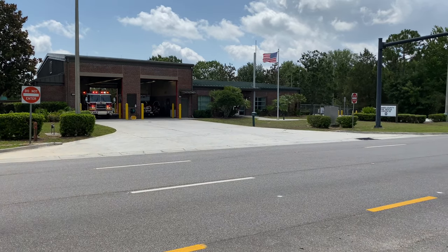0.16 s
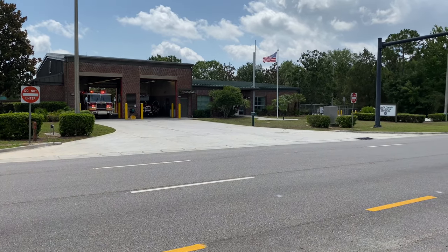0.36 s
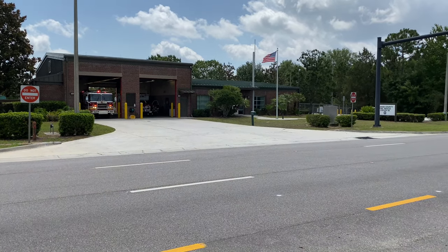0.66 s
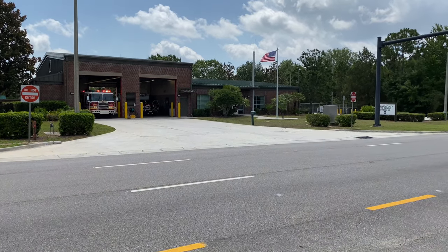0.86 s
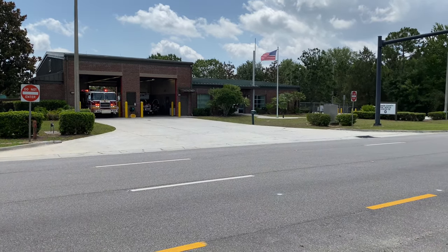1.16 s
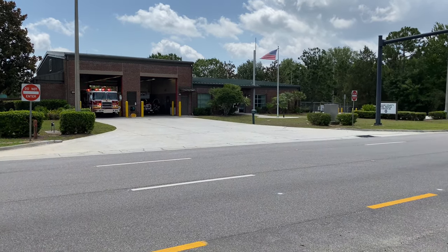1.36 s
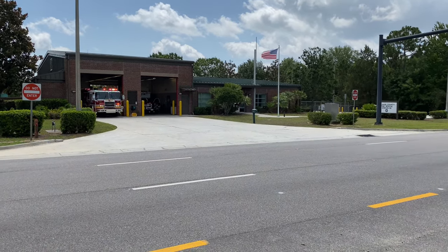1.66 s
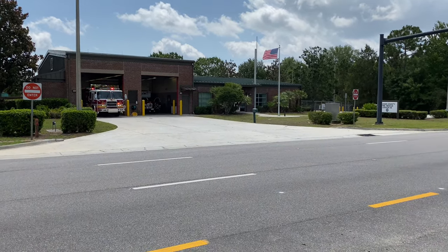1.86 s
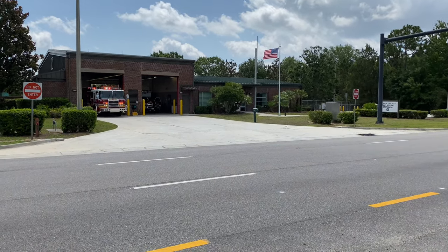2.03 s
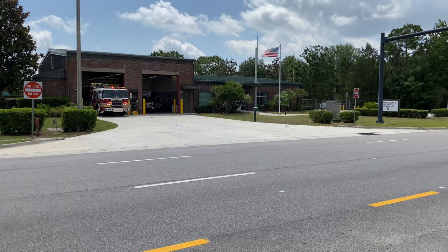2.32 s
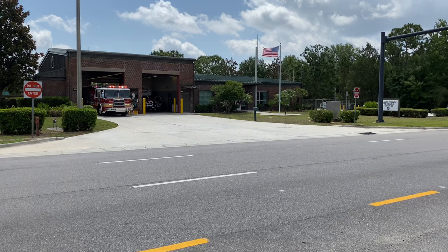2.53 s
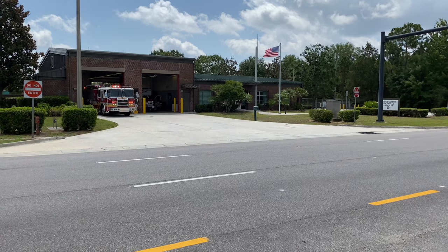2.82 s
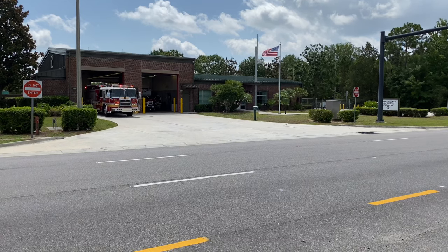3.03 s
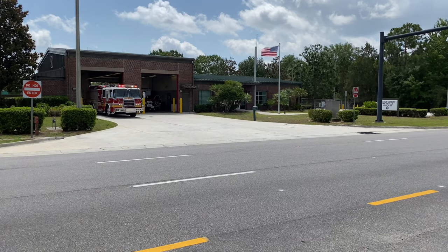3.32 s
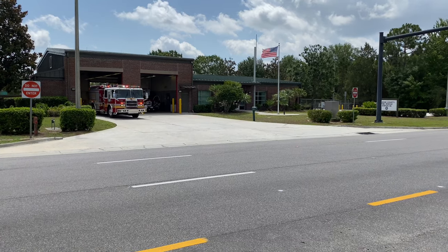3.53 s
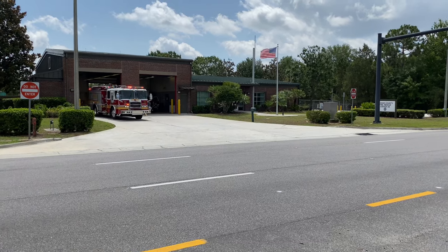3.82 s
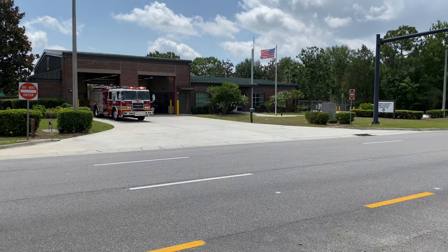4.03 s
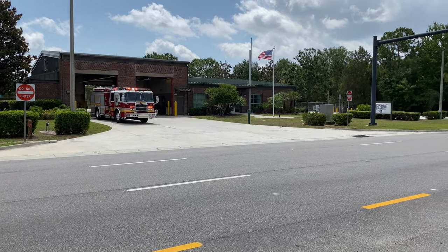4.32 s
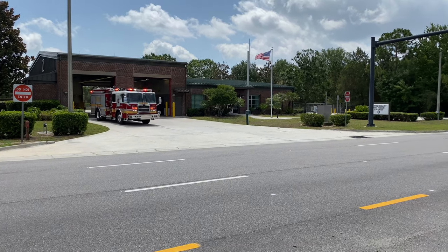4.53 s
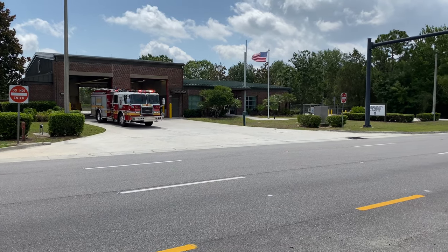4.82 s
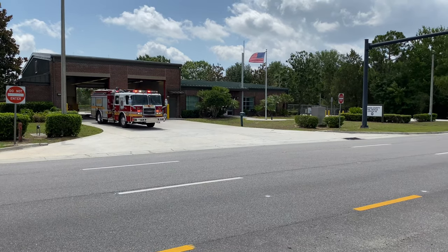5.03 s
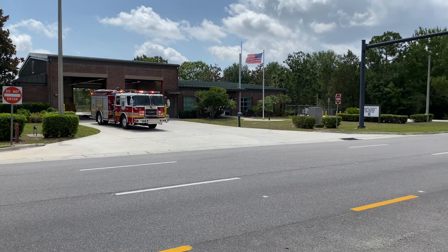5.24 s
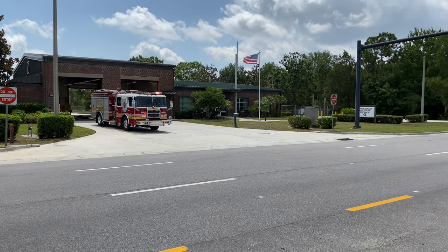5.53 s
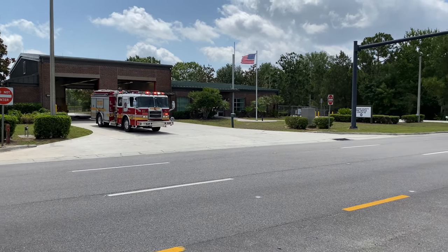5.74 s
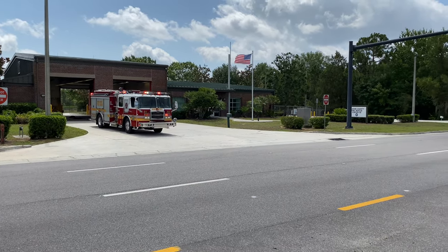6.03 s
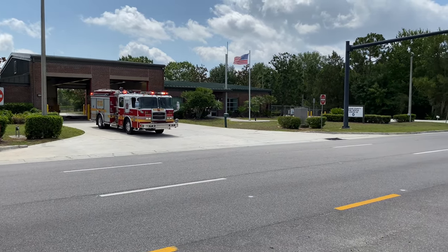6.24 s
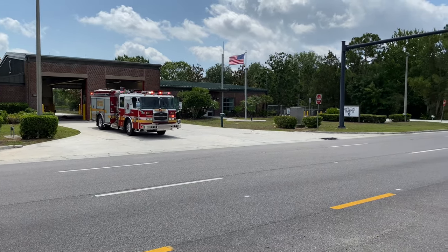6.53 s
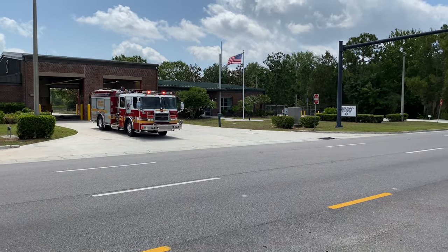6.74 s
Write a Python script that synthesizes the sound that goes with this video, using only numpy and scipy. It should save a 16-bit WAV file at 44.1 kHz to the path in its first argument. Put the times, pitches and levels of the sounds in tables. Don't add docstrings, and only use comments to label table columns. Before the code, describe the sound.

Outdoors across a road, a large diesel truck idles with a low throb and a dying machine hum. After about a second it revs and rolls out, growing louder with knocking, gear rattle and fan hiss. It lifts off, winds down closer to the listener, then brakes squeal and air spurts out. Wind buffets the hand-held phone throughout.

```python
import sys
import numpy as np
from scipy import signal
from scipy.fft import rfft, irfft
from scipy.io import wavfile
from scipy.ndimage import uniform_filter1d

SR = 44100
rng = np.random.default_rng(int(sys.argv[2]) if len(sys.argv) > 2 else 0)


def boost_factor(decibels):
    exponent = np.asarray(decibels, float) / 20
    return 10 ** exponent


def put_to_file(sound):
    columns = np.atleast_2d(sound).T
    safe = np.clip(columns, -1, 1)
    whole_steps = np.round(safe * 32767)
    wavfile.write(sys.argv[1], SR, whole_steps.astype(np.int16))


N = 303408
T = np.arange(N) / SR
HZ = np.maximum(np.fft.rfftfreq(N, 1 / SR), 1)
TOP_HZ = 15700

# start_s, pitch_hz, level_db
ALTERNATOR = [(1.75, 10100, -71), (1.85, 10700, -72), (1.96, 11150, -73), (2.2, 12050, -74),
              (2.35, 12400, -78)]


def unit(x):
    return x / np.sqrt(np.mean(x ** 2))


def over_hz(table):
    hz, value = np.transpose(table)
    return np.interp(np.log(HZ), np.log(np.maximum(hz, 1)), value)


def over_time(table):
    s, *columns = np.transpose(table)
    return [np.interp(T, s, column) for column in columns]


def swells(events):
    return sum(height * np.exp(-((T - s) / width_s) ** 2) for s, height, width_s in events)


def noise():
    return rng.standard_normal(N)


def smooth(x, size):
    return uniform_filter1d(uniform_filter1d(x, size), size)


def walk(rate):
    hold = int(SR / rate)
    steps = np.repeat(rng.standard_normal(N // hold + 1), hold)
    return unit(smooth(steps, hold)[:N])


def colour(x, table):
    below = np.maximum(np.log2(table[0][0] / HZ), 0)
    above = np.maximum(np.log2(HZ / table[-1][0]), 0)
    return unit(irfft(rfft(x) * boost_factor(over_hz(table) - 40 * (below + above)), N))


def ring(x, hz, width_hz):
    return signal.lfilter(*signal.iirpeak(hz, hz / width_hz, SR), x)


def ring_twice(x, hz, width_hz):
    return ring(ring(x, hz, width_hz), hz, width_hz)


def bursts(events, decay_s, sharp):
    out = np.zeros(N)
    t = np.arange(int(SR * .2)) / SR
    for s, db, hz in events:
        grain = rng.standard_normal(len(t)) * t * np.exp(-t / decay_s)
        burst = ring_twice(grain, hz, hz / sharp) * (1 - t / t[-1])
        i = int(s * SR)
        out[i:i + len(t)] += boost_factor(db) * burst / np.abs(burst).max()
    return out


def lifetime(table, edge_s):
    return np.clip(np.minimum(T - table[0][0], table[-1][0] - T) / edge_s, 0, 1)


def tones(tables, waver_hz, waver_db, rate):
    out = 0
    for table in tables:
        hz, db = over_time(table)
        phase = 2 * np.pi * np.cumsum(hz + waver_hz * walk(2 * rate)) / SR
        out = out + lifetime(table, .006) * boost_factor(db + waver_db * walk(rate)) * np.sin(phase)
    return out


def wind(alike=0.85):
    # centre_s, gain_db, width_s
    gusts = [(.07, 13.5, 0.085), (.35, 7, 0.07), (.62, 6, 0.26), (1.1, 10, 0.083), (1.22, 13.5, 0.029),
             (1.45, 8.5, .2), (2.3, -13, 0.18), (2.68, -3, .08), (2.89, 6, .05), (3.29, 20.5, .04),
             (3.49, 10, 0.052), (4.15, 4, .15), (4.37, -10, 0.048), (5.1, 5, .15), (5.42, 7, 0.048),
             (5.67, 7.5, 0.046), (5.87, 5.5, 0.11), (6.2, 3.5, .05), (6.31, 4.5, .04), (6.47, 5.5, 0.052),
             (6.6, -7, .06), (6.75, 5, .08)]
    # start_s, peak_db, centre_hz
    buffets = [(.065, -30, 60), (.33, -28, 70), (1.07, -28, 90), (1.2, -30, 110), (1.5, -28, 80),
               (2.83, -28, 110), (3.275, -21, 100), (3.45, -29, 100), (5.39, -31, 60), (5.64, -29, 90),
               (5.9, -35, 60), (6.13, -35, 80)]
    # frequency_hz, density_db (per Hz)
    rumble = [(24, -38), (34, -15), (50, -4), (65, -3.5), (90, -3), (130, -9.5), (200, -31.5), (300, -47)]
    breeze_db, flutter_db = -37.5, 2
    gust = boost_factor(breeze_db + swells(gusts) + flutter_db * walk(14))
    mid, side = (gust * colour(noise(), rumble) + bursts(buffets, 0.016, sharp=0.93) for _ in "ms")
    alike = np.clip(alike, 0, 1)
    return np.sqrt((1 + alike) / 2) * mid + np.sqrt((1 - alike) / 2) * side * np.array([[1], [-1]])


def drone():
    # start_s, pitch_hz, level_db
    hum = [(0, 189.8, -36), (.45, 188, -37), (.6, 187, -50)]
    return tones([hum], 3.05, 2., rate=10.1)


def tyre_grit():
    # start_s, peak_db, pitch_hz
    ticks = [(0.3701, -57, 11000), (2.6744, -53, 11200), (2.6973, -52, 11200), (2.8799, -51, 11290),
             (3.0584, -48, 11020), (3.0868, -53, 11200), (3.0999, -46, 11200), (3.1144, -50, 11200),
             (3.1398, -43, 11220), (3.1674, -49, 11260), (5.5847, -51, 11200)]
    return bursts(ticks, .0007, sharp=4.)


def body_rattles():
    # start_s, peak_db, pitch_hz
    clanks = [(5.56, -42, 1300), (5.565, -50, 4000), (5.7, -44, 3300), (5.705, -50, 4500),
              (5.81, -43, 2300), (5.955, -36, 1900), (5.965, -33, 1400)]
    return bursts(clanks, 0.004034, sharp=2.63)


def howls():
    # start_s, pitch_hz, level_db
    bands = [
        [(.7, 2300, -66), (1.1, 2330, -61), (2.0, 2330, -66), (2.45, 2280, -67), (2.75, 2290, -57),
         (3.4, 2280, -57), (3.8, 2450, -55), (4.5, 2420, -54), (4.8, 2330, -62), (5.8, 2330, -62),
         (6.1, 2330, -70)],
        [(2.0, 560, -56), (2.4, 590, -49), (2.75, 595, -45), (3.1, 590, -54), (3.7, 590, -52), (4.0, 590, -45),
         (4.4, 585, -49), (4.7, 580, -58)],
        [(4.7, 520, -54), (5.1, 545, -48), (5.5, 515, -47.5), (5.9, 495, -47.5), (6.3, 465, -52),
         (6.6, 435, -49), (6.88, 410, -50)],
        [(5.6, 900, -62), (6.0, 885, -52), (6.3, 840, -53), (6.6, 770, -51), (6.88, 740, -53)],
        [(6.25, 12700, -68), (6.34, 12900, -57), (6.45, 12900, -56), (6.62, 12700, -60)],
    ]
    sharp = 9
    out = 0
    for table in bands:
        hz, db = over_time(table)
        size = int(SR * sharp / table[0][1] / 2)
        a, b = (unit(smooth(noise(), size)) for _ in "ab")
        phase = 2 * np.pi * np.cumsum(hz) / SR
        out = out + lifetime(table, .05) * boost_factor(db) * (a * np.sin(phase) + b * np.cos(phase))
    return out


def chassis():
    # start_s, peak_db, pitch_hz
    knocks = [(1.7035, -38, 1890), (2.2618, -37, 1890), (2.7432, -35, 1780), (2.9312, -36, 1840),
              (3.0759, -35, 1980), (3.1652, -34, 1840), (3.3797, -35, 1950), (3.6152, -33, 1860),
              (3.7219, -30, 1920), (3.7589, -31, 1810), (3.8257, -32, 1890), (3.916, -31, 1820),
              (3.9818, -30, 1900), (4.137, -32, 1790), (4.1884, -31, 1870), (4.2632, -31, 1830),
              (4.3425, -29, 2010), (4.4737, -32, 1890), (4.5401, -29, 1870), (4.6024, -33, 1840),
              (5.2006, -36, 1800), (5.4046, -39, 1820), (5.9504, -36, 2080), (6.1424, -35, 2010),
              (6.5286, -36, 1890), (6.6408, -35, 1970)]
    # start_s, peak_db, pitch_hz
    chirps = [(5.7, -54, 3900), (5.99, -59, 5200), (6.145, -54, 4100), (6.245, -54, 4000),
              (6.53, -56, 4050)]
    breathy = boost_factor(1.5) * tones([ALTERNATOR], 170., 4., rate=150)
    teeth = boost_factor(-3.0) * bursts(knocks, .004, sharp=5.)
    return howls() + breathy + teeth + bursts(chirps, .014, sharp=16.)


def air_leak():
    # start_s, level_db
    leak = [(0, -62.5), (1.2, -62), (2.2, -58.5), (2.9, -60.5), (3.3, -66), (6.88, -103)]
    air = noise()
    high = unit(ring_twice(air, 7000., 1900.))
    low = unit(ring_twice(air, 3150., 600.))
    return boost_factor(over_time(leak)[0]) * (high + boost_factor(-1.0) * low)


def turbo():
    # start_s, pitch_hz, level_db
    spool = [
        [(0, 6415, -63), (.6, 6425, -63.5), (1.06, 6452, -62), (1.14, 7000, -63)],
        [(4.1, 9250, -80), (4.6, 8780, -69), (4.95, 8300, -72), (5.3, 7660, -70), (5.5, 7380, -71),
         (5.62, 7250, -64), (5.9, 7010, -66), (6.3, 6710, -64), (6.88, 6650, -64)],
    ]
    # start_s, pitch_hz, level_db
    belt = [
        [(0, 5250, -69), (.9, 5050, -69), (2.0, 4950, -69), (3.0, 5250, -69), (4.5, 5200, -82),
         (5.9, 5100, -80), (6.2, 5100, -71), (6.88, 5100, -71)],
    ]
    octave_db = -13
    octaves = []
    for table in spool:
        octaves.append([(s, 2 * hz, db + octave_db) for s, hz, db in table if hz < TOP_HZ / 2])
    whines = tones(spool + octaves + [ALTERNATOR], 14., 2.5, rate=30)
    return whines + tones(belt, 128.2, 4.6, rate=140)


def air_vent():
    # start_s, level_db
    vent = [(6.58, -80), (6.64, -45.5), (6.7, -36), (6.76, -39.5), (6.81, -41), (6.88, -46.5)]
    # frequency_hz, density_db (per Hz)
    hiss = [(1500, -28), (2500, 1), (3300, -15.5), (5000, -24), (6500, -20), (7500, -18.5), (10000, -12),
            (12000, -15.5), (13100, -15), (13450, -40), (13750, -7), (14400, -10), (15500, -16)]
    return (T > vent[0][0]) * boost_factor(over_time(vent)[0]) * colour(noise(), hiss)


def brake_squeal():
    # start_s, length_s, pitch_hz, level_db, glide_hz
    squeals = [(6.36, 0.083, 8620, -48.5, 92), (6.475, .18, 8800, -46, -58), (6.665, 0.016, 8730, -36, 0),
               (6.70, .045, 8750, -51, 0), (6.391, 0.04, 8000, -37, 50), (6.44, .14, 8150, -61, 0),
               (6.685, 0.03, 8310, -44.5, -100), (6.51, 0.023, 7370, -55, 4), (6.57, .08, 8830, -46.5, 73),
               (6.29, 0.053, 12850, -59, 150), (6.36, .045, 13150, -53, 0), (6.447, .025, 13100, -50, 0),
               (6.40, 0.033, 12700, -55, 0), (6.445, .075, 12720, -54, 31), (6.78, 0.018, 12420, -50, -30)]
    catch_s, ring_t60_s = .006, .07
    waver_hz, waver_db = 28.0 * walk(220), 3 * walk(110)
    late = T > squeals[0][0] - .2
    t = T[late]
    out = np.zeros(N)
    for k, (s, length, hz, db, glide_hz) in enumerate(squeals):
        own = slice(k * N // 20, k * N // 20 + len(t))
        catch = np.clip((t - s) / catch_s + .5, 0, 1) ** 2
        decay = boost_factor(-60 * np.maximum(t - s - length, 0) / ring_t60_s)
        pitch = hz + glide_hz * np.clip((t - s) / length, 0, 1) + waver_hz[own]
        phase = 2 * np.pi * np.cumsum(pitch) / SR
        out[late] += catch * decay * boost_factor(db + 9.5 + waver_db[own]) * np.sin(phase)
    return out


def firing_cycle():
    # start_s, firing_hz, load (0-1), clutch (0-1)
    revs = [(0, 38.04, 0.06, 0.02), (.5, 38.08, 0, 0.18), (.95, 38.29, 0.02, 0.28),
            (1.3, 50.06, 0.38, 0.44), (1.7, 56.75, 0.86, 0.64), (2.1, 59.1, 0.84, 0.74),
            (2.5, 63.3, 1, 0.78), (2.9, 62.96, 1, 0.91), (3.3, 54.38, 0.89, .5), (3.7, 57.25, 0.92, 0.76),
            (4.1, 59.04, 1, 0.8), (4.56, 58.96, 0.96, 0.64), (4.72, 53, .55, 0.12), (5.0, 42, 0.02, 0),
            (5.6, 39.3, 0, 0.32), (6.2, 39.06, 0.02, 0.53), (6.88, 39.03, 0.12, 0.81)]
    cylinder_db = [0, -11, -5, 0, -10, -5]
    hz, load, clutch = over_time(revs)
    uneven = np.clip(0.076 + .7 * load ** 2, 0, 1)
    turn = np.cumsum(hz * (1 + 0.0028 * walk(12))) / SR
    count = turn.astype(int)
    size = boost_factor(uneven * np.take(cylinder_db, count, mode="wrap") + 0.32 * noise()[count])
    puff = size * np.exp(-(turn % 1 / hz) / 0.0025)
    pulses = np.diff(count, prepend=0) * size
    return load, clutch, puff, pulses


def silencer_boom(pulses):
    # pitch_hz, width_hz, level_db
    chambers = [(78, 30, -5), (112, 20, -8), (140, 22, 0), (185, 30, -10), (236, 30, -12), (332, 40, -16)]
    modes = 0
    for k, (hz, width_hz, db) in enumerate(chambers):
        modes = modes + (-1) ** k * boost_factor(db) * ring(ring(pulses, hz, 2 * width_hz), hz, width_hz)
    return unit(modes)


def exhaust_roar(puff):
    # frequency_hz, density_db (per Hz)
    roar = [(40, -21), (70, -10.5), (100, -3), (120, -3.5), (138, 3.5), (156, -5.5), (175, -4),
            (200, -11.5), (240, -12.5), (300, -24)]
    # centre_s, gain_db, width_s
    surges = [(.01, 10.5, 0.033), (1.11, 5, 0.1), (2.32, 7.5, 0.092), (2.82, 4, .1), (3.15, -3, .1),
              (4.48, 3.5, .08), (4.85, 6, 0.11), (5.17, -10, 0.15), (5.39, 3, .1), (6.15, 2.5, 0.088)]
    return colour(noise() * (1 + .6 * puff), roar) * boost_factor(swells(surges) - 3.0)


def intake_drone(puff):
    # frequency_hz, density_db (per Hz)
    intake = [(180, -9.5), (250, 0), (330, -2.5), (420, -11), (520, -9), (620, -9), (800, -11.5),
              (950, -29.5), (1100, -22.5)]
    return colour(noise() * (1 + 0.2 * puff), intake)


def block_knock(puff):
    # frequency_hz, density_db (per Hz)
    knock = [(850, 2), (1000, 1), (1200, 2.5), (1400, 0), (1580, -4.5), (1870, 1.5), (2150, -7), (2350, -2),
             (2650, -6), (2850, -14), (3100, -20), (3500, -24.5)]
    return colour(noise() * (1 + 0.47 * puff) * boost_factor(0.59 * walk(6)), knock)


def cooling_fan(puff, clutch):
    # frequency_hz, density_db (per Hz)
    fan = [(2600, -5), (3200, -4.5), (4000, -9.5), (4700, -17), (5200, -14.5), (6000, -15.5), (7200, -17),
           (8500, -18), (10000, -20), (12000, -23.5), (13500, -26), (14900, -25), (15150, -38),
           (15400, -70)]
    idle_db, grip_db = -65, 10
    hiss = colour(noise() * (1 + 0.74 * puff) * boost_factor(0.84 * walk(5.22)), fan)
    return boost_factor(idle_db + 5.5 + grip_db * clutch) * hiss


def gear_rattle(puff):
    # centre_s, gain_db, width_s
    pulls = [(.9, 4, .25), (1.6, 3, .12), (3.74, 8, 0.15), (4.0, 5, .15), (4.35, 4.5, 0.25), (5.0, 4, .2),
             (5.6, 5, .2), (5.95, 4, .08), (6.75, 4, .2)]
    return boost_factor(swells(pulls)) * unit(ring_twice(noise() * (1 + 1.5 * puff), 1896, 290.))


def panel_rattle(puff):
    # centre_s, gain_db, width_s
    shakes = [(3.1, 3, .15), (4.3, 3, .2), (5.96, 7.5, 0.049), (6.3, 4, .2), (6.72, 6, 0.2)]
    return boost_factor(swells(shakes)) * unit(ring_twice(noise() * (1 + 1.3 * puff), 1405, 160.))


def pipe_song(flow):
    # centre_s, sharp_hz, width_s
    overshoots = [(1.68, 30, .2), (2.6, 40, .2), (4.35, 24.93, .2), (4.57, -20, .08), (4.78, -35, .12)]
    # centre_s, gain_db, width_s
    sings = [(1.55, 6, .25), (2.2, -4, .2), (3.2, 6, .07), (3.6, 6.5, 0.13), (4.37, 6, .07), (4.57, 8, .07),
             (4.75, 14, 0.13)]
    idle_hz, load_hz = 660, 124.9
    hz = idle_hz + load_hz * flow + swells(overshoots)
    breath = unit(smooth(noise(), 800))
    return boost_factor(swells(sings)) * unit((.5 + breath) * np.sin(2 * np.pi * np.cumsum(hz) / SR))


def engine():
    # start_s, distance_m
    distance = [(0, 59), (1.2, 56.3), (3.1, 46.7), (3.8, 38.6), (4.6, 37.8), (6.0, 30.8), (6.88, 27.8)]
    load, clutch, puff, pulses = firing_cycle()
    nearer_db = 20 * np.log10(distance[0][1] / over_time(distance)[0])

    def gain(idle_db, load_db, share):
        return boost_factor(idle_db + load_db * load + share * nearer_db)

    flow = np.sqrt(np.clip(load, 0, 1))
    rattle = boost_factor(1.3 * walk(7))
    out = gain(-37, 5.8, -0.23) * silencer_boom(pulses)
    out = out + gain(-33.5, 9.6, 0.12) * exhaust_roar(puff)
    out = out + gain(-45.5, 10.1, 1.126) * intake_drone(puff)
    out = out + gain(-50.5, 8.36, 1.29) * block_knock(puff)
    out = out + cooling_fan(puff, clutch)
    out = out + gain(-60, 7.3, 1.43) * rattle * gear_rattle(puff)
    out = out + gain(-61, 5.3, 1.5) * rattle[::-1] * panel_rattle(puff)
    pipe_db = 14.6
    return out + gain(-65, 0, 0.43) * boost_factor(pipe_db * flow) * pipe_song(flow)


def ground_dip(x):
    # start_s, share cancelled (0-1)
    dips = [(0, .2), (1.0, .1), (1.7, .1), (2.0, .5), (2.8, .5), (3.1, 0), (4.3, 0), (4.7, .2), (5.2, 0),
            (6.88, 0)]
    return x - np.clip(over_time(dips)[0], 0, 1) * ring(x, 1560, 200)


def ports(x, yard_s=.06):
    # frequency_hz, phase the left port leads by (radians)
    lead_table = [(0, 0), (1000, .55), (1890, 1.3), (2400, 2), (3190, 3.5), (4220, 6.3), (4910, 7.6),
                  (6290, 4.9), (7150, 4.6), (7900, 7), (8500, 9.1), (10400, 6.4), (11600, 6.3),
                  (12900, 3.3), (13900, 3.1), (15300, 0)]
    # frequency_hz, left minus right level_db
    tilt = [(60, 0.5), (300, -1.5), (900, 1.5), (1700, -3.5), (2400, -5.5), (3100, 3.5), (3800, -0.5),
            (4500, 11), (5200, 9.5), (5900, -1), (6500, 13), (7200, -12), (8600, 3.5), (10000, 0)]
    # frequency_hz, share alike at both ports (0-1)
    likeness = [(60, 1), (400, 0.965), (1000, 0.88), (3100, 0.88), (4000, 1), (5300, 0.5), (6500, 0.55),
                (7700, 0.3), (8800, 0.9), (10300, 0.6), (15000, 1)]
    direct = rfft(x)
    delay_s = yard_s * np.repeat(rng.random(len(HZ) // 150 + 1), 150)[:len(HZ)]
    early = x * np.clip((T[-1] - T) / yard_s - 1, 0, 1)
    scattered = rfft(early) * np.exp(-2j * np.pi * np.cumsum(delay_s) * SR / N)
    alike = np.clip(over_hz(likeness), 0, 1)
    sides = np.array([[1], [-1]])
    both = np.sqrt((1 + alike) / 2) * direct + sides * np.sqrt((1 - alike) / 2) * scattered
    lead = np.interp(HZ, *np.transpose(lead_table))
    return irfft(both * boost_factor(sides * over_hz(tilt) / 2) * np.exp(.5j * sides * lead), N)


def masked_bands(x):
    # start_s, length_s, low_hz, high_hz
    dropouts = [(6.27, .22, 13900, 15600), (6.395, .075, 9150, 10950), (6.435, .085, 11000, 12350),
                (6.53, .083, 9500, 11000), (6.555, .04, 11400, 12350), (6.6, .035, 9100, 9900),
                (6.415, .03, 6950, 7500), (6.692, .032, 3200, 3550), (6.765, .056, 2750, 3520),
                (6.766, .03, 6380, 6900)]
    out = x.copy()
    for s, length, lo_hz, hi_hz in dropouts:
        near = slice(int((s - .03) * SR), int((s + length + .03) * SR))
        band_pass = signal.butter(8, [lo_hz, hi_hz], "band", fs=SR, output="sos")
        band = signal.sosfiltfilt(band_pass, out[:, near])
        inside_s = np.minimum(T[near] - s, s + length - T[near])
        out[:, near] -= band * np.clip(inside_s / .006 + .5, 0, 1)
    return out


def scene():
    truck = drone() + tyre_grit() + body_rattles() + air_leak() + turbo() + engine()
    brakes = air_vent() + brake_squeal()
    return wind() + ports(chassis()) + ports(brakes, yard_s=.02) + ports(ground_dip(truck))


def low_pass(x):
    return signal.sosfilt(signal.butter(12, 16750, fs=SR, output="sos"), x)


def record(dry):
    top_cut = signal.ellip(10, .2, 80, TOP_HZ, fs=SR, output="sos")
    mix = masked_bands(signal.sosfilt(top_cut, dry))
    return low_pass(mix)


dry = scene()
out = record(dry)
put_to_file(out)
```